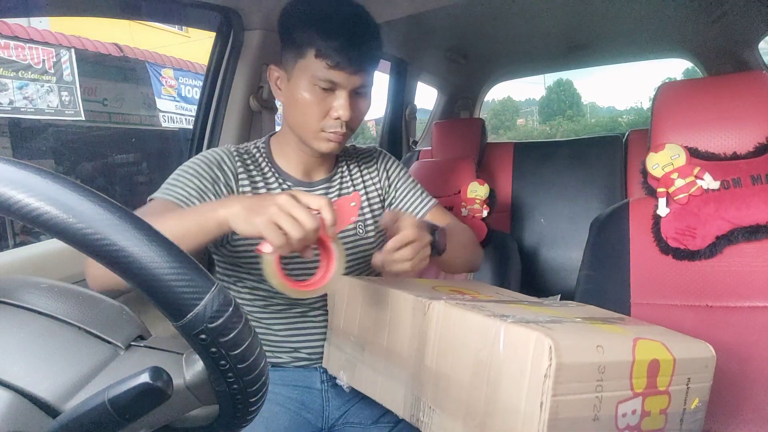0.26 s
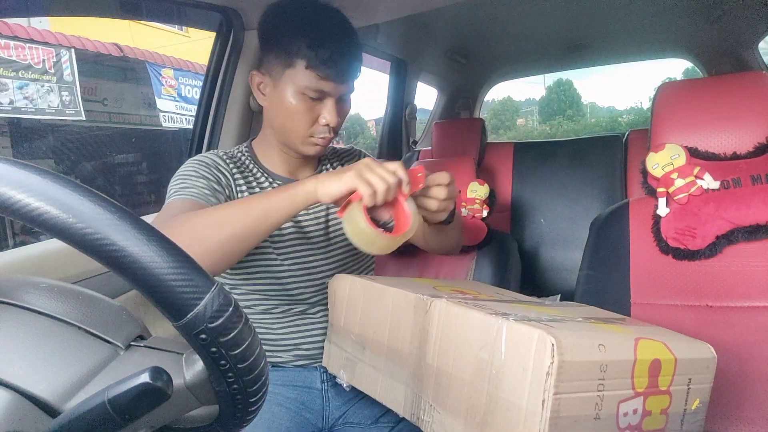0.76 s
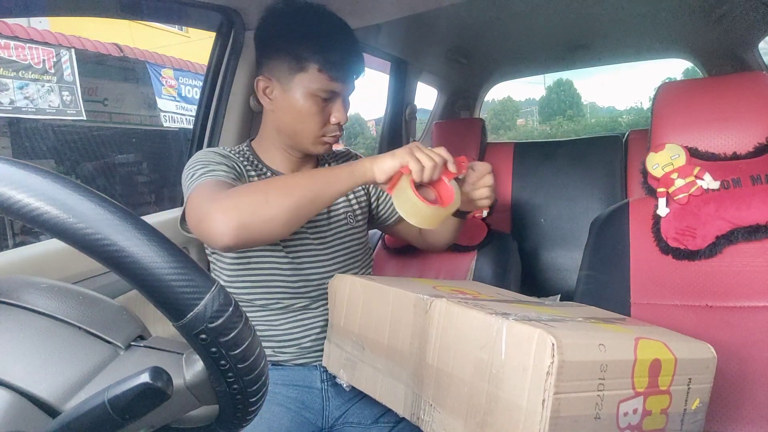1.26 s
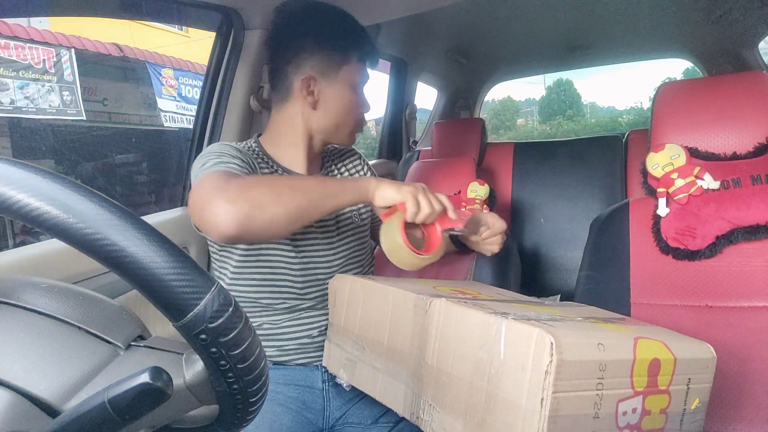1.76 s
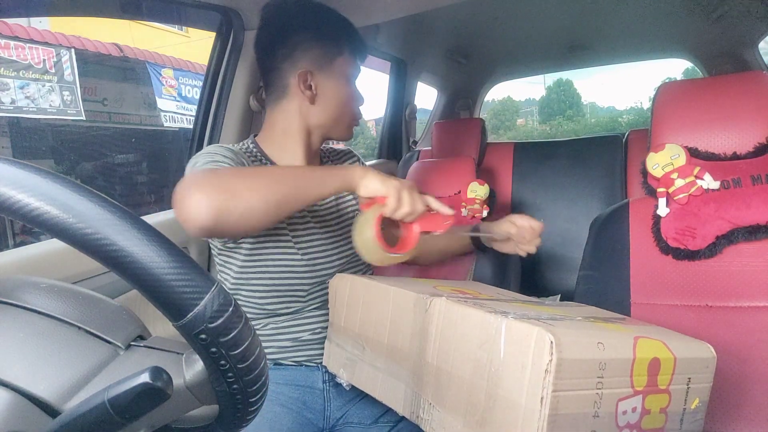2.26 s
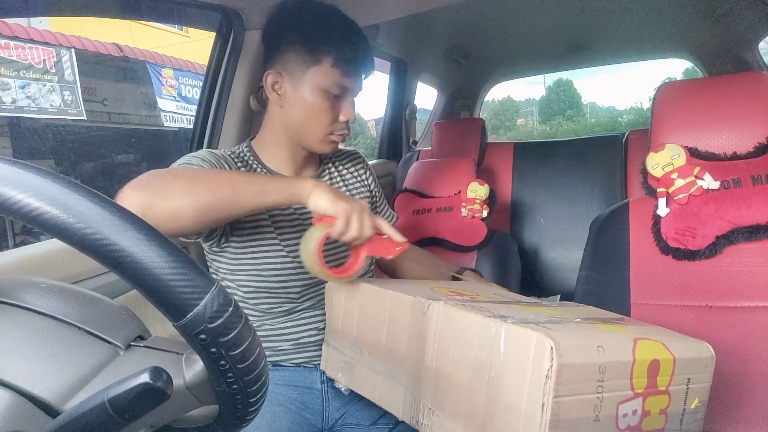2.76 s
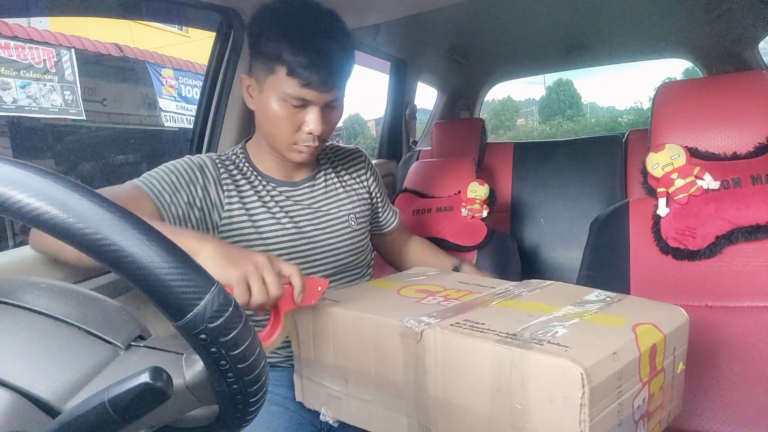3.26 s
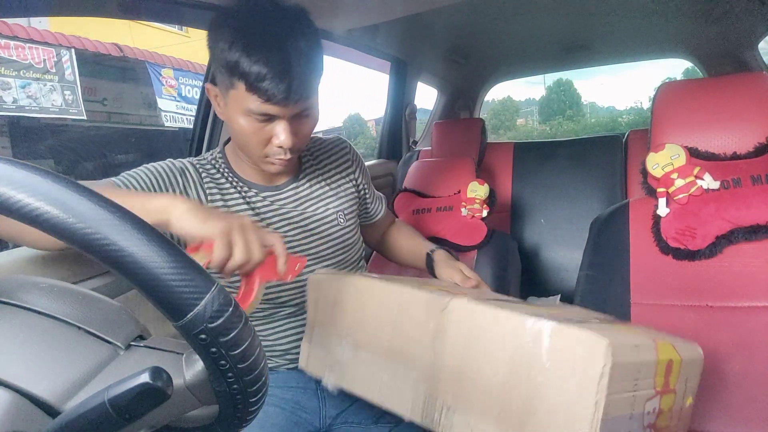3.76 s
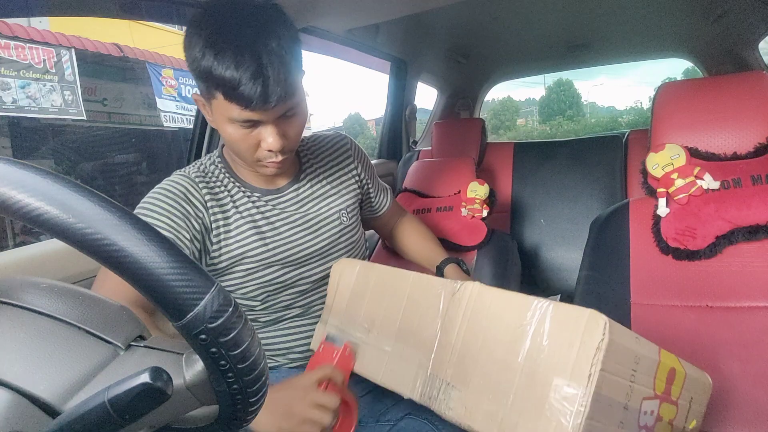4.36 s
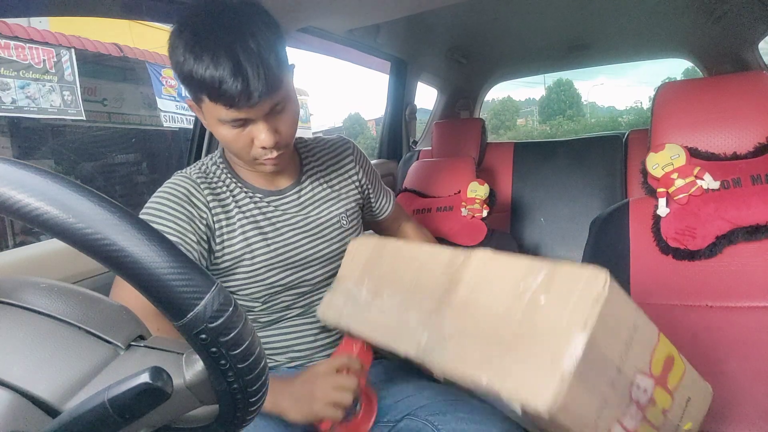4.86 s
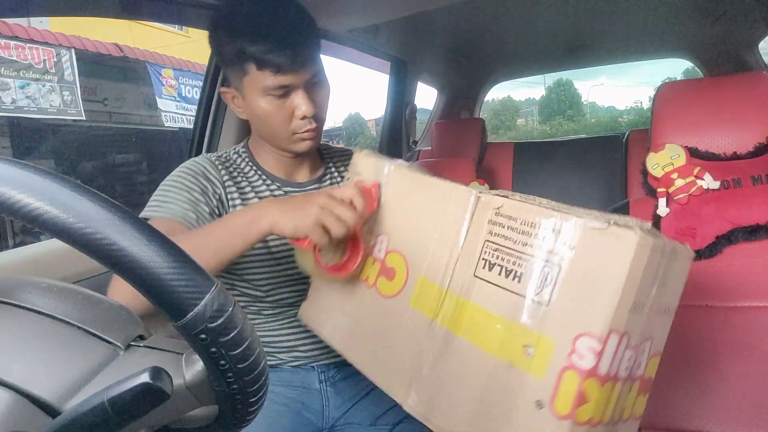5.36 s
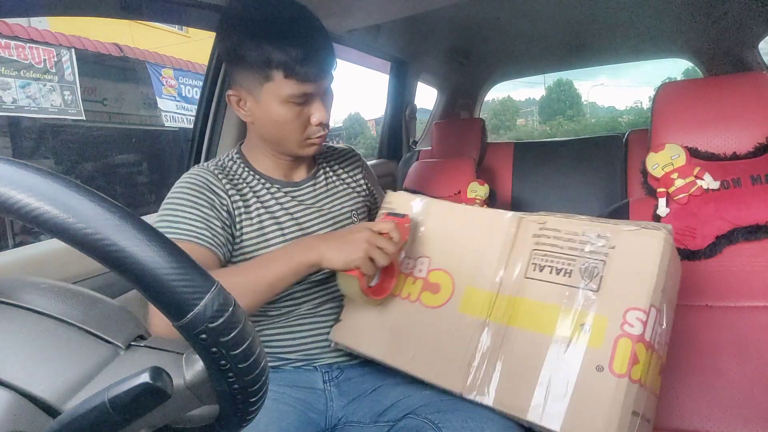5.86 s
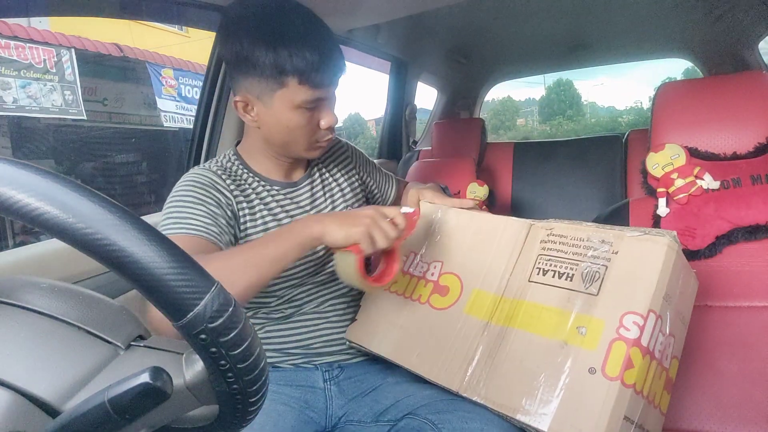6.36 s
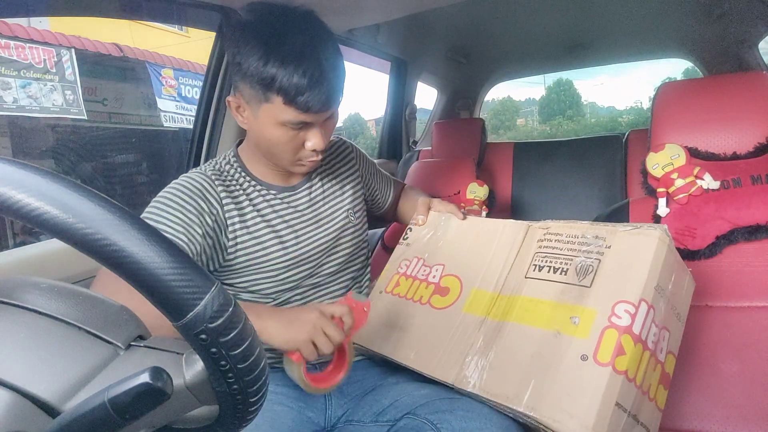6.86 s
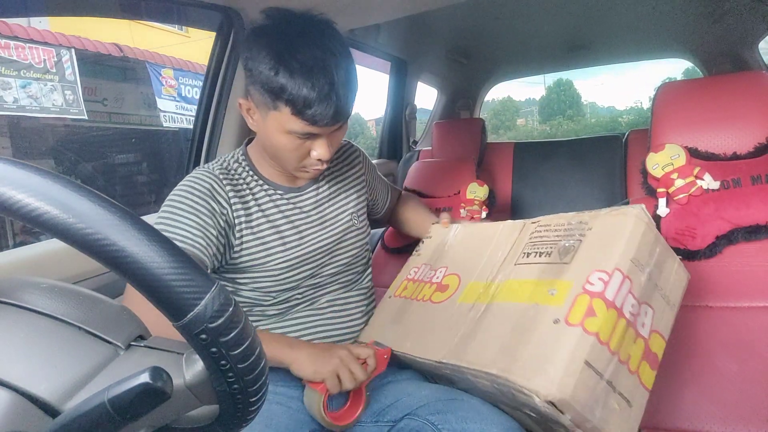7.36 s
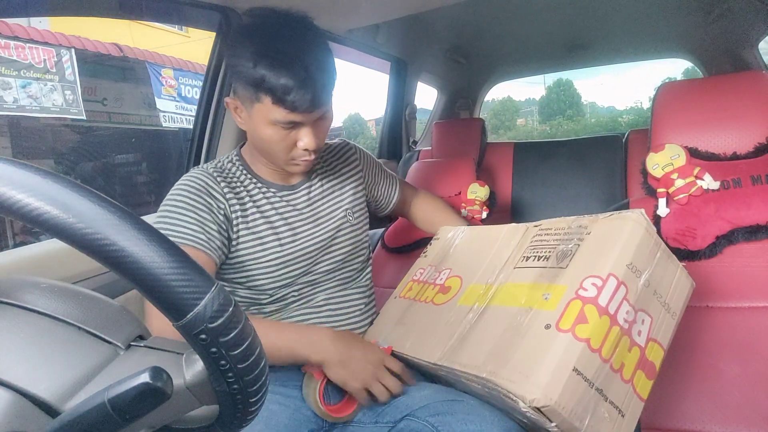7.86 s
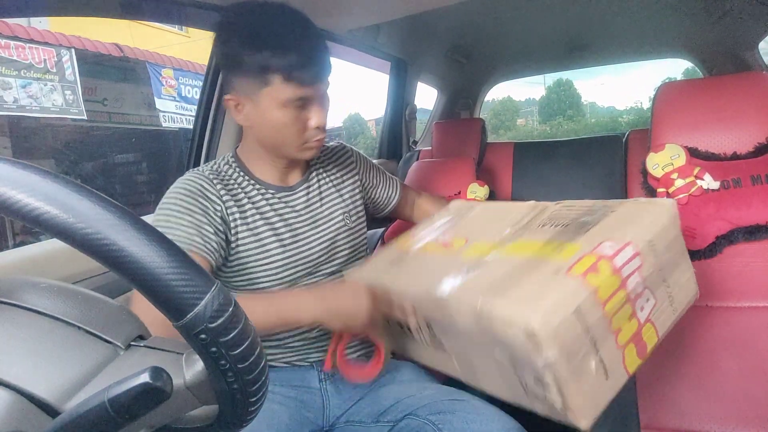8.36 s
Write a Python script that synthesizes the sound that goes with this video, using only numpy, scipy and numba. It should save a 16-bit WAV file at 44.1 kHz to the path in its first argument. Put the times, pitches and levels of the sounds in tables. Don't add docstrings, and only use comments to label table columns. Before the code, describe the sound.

Bright, crackling bursts of sticky tape peeling and snapping, with faint film rustle and soft cardboard knocks, above muffled idling and traffic rumble.

```python
import sys
import numpy as np
from scipy import signal
from scipy.fft import rfft, irfft, next_fast_len
from scipy.io import wavfile
from scipy.ndimage import uniform_filter1d, map_coordinates
from numba import njit

SR = 44100
rng = np.random.default_rng(int(sys.argv[2]) if len(sys.argv) > 2 else 0)


def undo_db(level):
    steps = np.asarray(level, float) / 20
    return 10 ** steps


def wrap_up_sound(samples):
    columns = np.atleast_2d(samples).T
    tamed = np.clip(columns, -1, 1)
    steps = np.round(tamed * 32767).astype(np.int16)
    wavfile.write(sys.argv[1], SR, steps)


N = 380141

# pitch_hz, level_db (per Hz)
ROAD_COLOUR = [(18, -36), (30, -6), (120, -9), (184, -4), (355, -20.5), (499, -22), (540, -25.5),
               (666, -32.5), (889, -29.5), (1190, -37), (1590, -32), (1910, -41.5), (8520, -50.5),
               (16000, -67)]
# pitch_hz, likeness (0-1)
OUTSIDE_ALIKE = [(60, 0.93), (130, 1), (290, 0.78), (520, 0.52), (700, 0.3), (1400, 0.34), (3000, 0.034)]
# start_s, hold_s, depth_db
DUCKS = [(1.106, 0.029, 9.5), (1.217, 0.25, 2), (1.423, 0.039, 7), (1.785, 0.24, 12.5), (3.45, 0.13, 4),
         (4.058, 0.11, 8), (4.931, 0.031, 8), (5.156, 0.044, 5), (5.435, 0.059, 3), (5.6, 0.036, 12),
         (5.7, 0.13, 5), (6.06, 0.097, 15.5), (6.293, 0.19, 13), (6.684, 0.059, 11.5), (8.15, 0.058, 6)]
# time_s, firing_hz, first_order_db, second_order_db
ENGINE = [(0.0, 27.9, -34.5, -32), (1.06, 27.59, -41.5, -35), (1.9, 31.05, -57, -66.5),
          (2.09, 33, -47.5, -48.5), (2.64, 34, -45.5, -53), (3.77, 25.69, -39, -46),
          (4.08, 24.45, -61, -74), (4.44, 24.33, -50, -41.5), (6.7, 25.13, -49.5, -76),
          (7.13, 25.45, -42.5, -59), (7.46, 23.52, -53, -37), (7.92, 23.46, -35.5, -40.5),
          (8.09, 25.05, -39, -55), (8.62, 23.4, -37, -32.5)]
# multiple (of firing_hz), level_db (re second order)
HIGHER_ORDERS = [(3, -39), (4, -12.5), (6, -16.5), (7, -20.5), (10, -19.5)]
# time_s, pitch_hz, level_db
SECOND_MOTOR = [
    (0, 125.8, -61),
    (.15, 126.9, -47),
    (.262, 127.1, -41),
    (.426, 131, -38.5),
    (.6, 134.9, -43),
    (1.085, 138.5, -37.5),
    (1.12, 143.4, -60),
    (1.7, 137.7, -40.5),
]

# start_s, peak_db
TICKS = [(0.124, -36), (.179, -12.5), (.2618, -46), (0.5454, -30), (.605, -39), (0.619, -34),
         (0.642, -24.5), (.7058, -46), (.735, -32), (.8984, -39), (0.9703, -35), (1.0056, -26),
         (1.5655, -26.5), (2.14, -26), (2.724, -16.5), (2.945, -28), (3.1899, -17.5), (3.24, -34),
         (3.262, -32), (3.76, -41), (3.79, -25), (3.988, -31), (4.008, -35), (4.364, -34), (4.384, -26.5),
         (4.767, -24.5), (7.2545, -31.5), (8.027, -22.5), (7.873, -27), (8.339, -28.5), (8.379, -20),
         (8.547, -21.5)]
# start_s, length_s, start_level_db, end_level_db
RIPS = [(.935, 0.037, -43.5, -29), (1.09, 0.047, -17.5, -17.5), (1.149, 0.02, -17, -26.5),
        (1.42, 0.044, -15, -22.5), (1.747, 0.03, -18.5, -15), (1.79, 0.29, -15.5, -15.5),
        (2.459, 0.022, -16.5, -18), (2.502, 0.065, -18, -17.5), (2.577, 0.032, -20.5, -17),
        (2.602, 0.026, -17, -18), (2.63, 0.069, -23, -35), (3.309, 0.048, -16, -20),
        (3.354, 0.18, -16.5, -18), (4.068, 0.05, -23.5, -16), (4.128, 0.093, -15.5, -16.5),
        (4.852, 0.12, -27, -32), (5.056, 0.047, -36.5, -26), (5.113, 0.018, -25, -17),
        (5.138, 0.013, -12.5, -20), (5.16, 0.026, -37, -37), (5.442, 0.047, -30.5, -29.5),
        (5.512, 0.12, -24.5, -27.5), (5.68, 0.01, -51, -19.5), (5.692, 0.069, -28.5, -31),
        (5.923, 0.027, -24, -35.5), (6.077, 0.082, -29.5, -22.5), (6.13, 0.058, -20, -20.5),
        (6.195, 0.031, -19.5, -25.5), (6.298, 0.078, -23.5, -25.5), (6.366, 0.061, -22, -13.5),
        (6.432, 0.11, -13, -21), (6.639, 0.13, -16, -18.5), (6.739, 0.054, -17, -19),
        (8.328, 0.039, -32, -41), (8.45, 0.036, -43, -27.5), (8.48, 0.03, -26, -39)]
# start_s, peak_db, t60_s
JERKS = [(1.0384, -11.5, 0.032), (1.196, -6, 0.05), (1.2311, -3, 0.031), (1.3241, 3, 0.02),
         (1.384, -4.5, 0.057), (1.6748, -16.5, 0.048), (1.6996, -11.5, 0.042), (3.835, -1, 0.048),
         (3.873, -6, 0.034), (3.8907, -7, 0.029), (5.3057, -12, .017), (5.316, -1, 0.024),
         (5.3387, -3.5, 0.029), (5.951, -7, .04), (6.037, -14, 0.024), (6.0437, -17.5, 0.086),
         (6.262, -2, 0.021), (7.7869, -10.5, 0.038), (7.8037, -11.5, 0.044), (8.0885, -4, 0.022),
         (8.123, -4.5, 0.063), (8.1845, -11, 0.038), (8.1993, -4.5, 0.018), (8.262, -12.5, 0.019)]
# start_s, peak_db
STUTTERS = [(1.0888, -8.5), (1.15, -10), (1.4182, -7), (1.756, -12), (1.764, -12), (1.7747, -19),
            (1.791, -28), (1.8094, -28), (2.459, -16), (2.4997, -13), (2.565, -20), (2.6355, -15),
            (2.66, -16), (3.309, -6), (3.3157, -3.5), (3.424, -14), (3.4545, -17), (3.462, -16),
            (4.041, -2.5), (4.054, -5), (4.0682, -17), (4.081, -10), (4.853, -6), (4.893, -9.5),
            (4.9112, -6), (4.916, -14), (4.953, -17), (4.977, -13), (5.075, -18.5), (5.119, -9.5),
            (5.178, -17), (5.192, -20.5), (5.443, -6), (5.4595, -3.5), (5.4737, -3.5), (5.5114, -11),
            (5.5225, -5), (5.5338, -7), (5.5388, -18), (5.5608, -5), (5.58, -4.5), (5.612, -6.5),
            (5.6992, -8), (5.711, -14), (5.7267, -6), (5.7375, -13), (5.7567, -2), (5.924, -8),
            (5.9375, -6), (6.076, -22), (6.184, -9), (6.197, -17), (6.299, -18), (6.4038, -15),
            (6.5013, -13), (6.536, -5), (6.639, -22), (6.6536, -18), (6.713, -24), (8.131, -7)]
# pitch_hz, level_db (per Hz)
PEEL_COLOUR = [(530, -41), (900, -37), (979, -9.5), (1130, -30), (1340, -16.5), (1900, -9), (2730, -9.5),
               (3860, -2), (5160, -0.5), (8550, 3.5), (11700, -14.5), (15100, -26), (16000, -3)]
# start_s, ring_hz, tuned_share (0-1), level_db (re peel)
SPAN = [(0, 515, 0.3, -22), (1.095, 579, .7, -18.5), (1.13, 981, 0.4, -24), (1.225, 1400, 0.5, -17),
        (1.3, 1000, 0.1, -21), (1.72, 504, 0.58, -20.5), (2.4, 984, 0.16, -9), (2.535, 930, 0.11, -11.5),
        (2.7, 1400, 0.3, -23), (3.295, 925, 0.4, -15), (3.345, 940, .1, -12.5), (3.39, 966, 0.3, -13.5),
        (3.465, 1610, 0.8, -14.5), (3.7, 1130, 0.44, -18), (3.92, 920, 0.3, 4.5), (4.03, 954, 0.8, -11.5),
        (4.075, 960, 0.52, -12.5), (4.14, 885, 0.6, -12.5), (4.18, 1015, 0.5, -10.5), (4.3, 940, 0.15, -3),
        (4.8, 940, 0, -30), (5.03, 427, 0.3, -11.5), (5.25, 925, 0, -17.5), (5.505, 1095, 0.43, -16.5),
        (5.68, 910, 0, -21), (5.9, 1276, 0.1, -18), (6.03, 1320, 0, -19), (6.14, 1510, 1, -12),
        (6.33, 1490, 0.1, -21), (6.41, 1520, 0.3, -20.5), (6.46, 980, 0.4, -17), (6.6, 1613, 0, -14),
        (6.7, 1470, 0.4, -18), (7.5, 807, .4, -22.5)]
# start_s, ring_hz, ring_db (re peel), fizz_db (re peel)
GRIP = [(0, 2070, -17, -4), (1.13, 2180, -8, -12), (1.3, 2140, -26, -5.5), (1.72, 1860, -8, -9),
        (1.83, 1886, -12, -10.5), (2.4, 1930, -13, -24), (2.515, 3060, -6.5, -9), (2.575, 3020, -21, -12),
        (2.6, 2980, -8, -5), (2.645, 2850, -25, -7), (3.2, 2727, -14, -5), (3.35, 2600, -25, 0.5),
        (3.41, 2400, -11, -6), (3.445, 2200, -11, -10), (3.478, 1610, -8, -9), (3.7, 2190, -27, -13),
        (4.15, 2220, -29, -5), (4.19, 1790, -5.5, -5), (4.3, 2260, -31, -0.5), (5.03, 2310, -14.5, -4.5),
        (5.25, 2140, -28, -2), (5.68, 2100, -35, 2.5), (5.75, 2170, 1.5, 5), (5.9, 1810, -8, 2.5),
        (6.03, 2040, -0.5, -9), (6.12, 2120, -3, -6), (6.29, 2030, -9, -14), (6.41, 2240, -12, -12),
        (6.6, 2280, -11, -23), (7.5, 2400, -21, -6), (8.3, 2290, -22, -4)]
# start_s, low_hz, low_db (re peel), high_hz, high_db (re peel)
ROLL = [(0, 4460, -7, 7140, -5), (.9, 2870, -17, 4450, -17.5), (1.3, 2490, -18.5, 3960, -19),
        (1.72, 2920, -8.5, 3700, -12), (1.83, 3053, -17, 4520, -18), (1.95, 3380, -22, 4100, -22),
        (2.4, 3280, -22, 3750, -11), (2.5, 1860, -12, 4210, -13), (2.58, 4160, -23, 4700, -30),
        (3.2, 2750, -20, 4270, -8), (3.335, 1570, -29, 4350, -24), (3.415, 3400, -18, 4350, -12),
        (3.44, 3300, -24, 3790, -16), (3.49, 3230, -11.5, 2170, -8.5), (3.7, 1770, -16, 4150, -12),
        (4.02, 3100, -15, 6650, -13), (4.13, 3000, -15, 477, -26), (4.178, 2950, -16, 730, -23),
        (4.3, 2940, -26, 4240, -34), (5.03, 2000, -20, 4210, -20), (5.25, 3080, -19, 5780, -13),
        (5.4, 2230, -12.5, 4130, -17), (5.505, 2210, -17, 3720, -19), (5.68, 2200, -29, 4370, -20),
        (5.9, 2100, -12, 3730, -12), (6.03, 3700, -7.5, 4850, -24), (6.205, 3500, -14, 1480, -13.5),
        (6.258, 3670, -14, 4910, -13.5), (6.37, 3600, -10, 4770, -21), (6.46, 3000, -7, 3770, -10.5),
        (6.6, 3010, -13, 3960, -20), (6.7, 880, -16, 3960, -10.5), (7.5, 2800, -6.5, 3600, -8),
        (7.95, 2106, -20, 3530, -18), (8.3, 2310, -23, 4320, -21)]
# start_s, level_db (re peel)
CARTON = [(0, -23), (.9, -13.5), (1.3, -11.5), (1.72, -11.5), (1.83, -11.5), (2.4, -7), (2.5, -8.5),
          (2.58, -7.5), (2.7, -20), (3.2, -11), (3.34, -18), (3.41, -7), (3.7, -2.5), (4.02, -13),
          (4.13, -15.5), (4.3, 2.5), (4.8, -27), (5.03, -19), (5.25, -26), (5.4, -19), (5.505, -11.5),
          (5.68, -19), (5.9, -16.5), (6.03, -8.5), (6.24, -4.5), (6.37, -12), (6.46, -18), (6.6, -9),
          (6.7, -9.5), (7.5, -19), (7.95, -4), (8.3, -14.5)]

# start_s, length_s, start_level_db, end_level_db
RUSTLE = [(.9, .18, -65, -50), (1.25, 0.11, -44, -35), (1.57, 0.028, -42.5, -43), (1.63, .11, -69, -44.5),
          (2.12, 0.17, -49, -63), (2.365, 0.097, -45, -50), (2.7, 0.25, -46, -58), (3.21, 0.088, -60, -38),
          (3.6, 0.21, -64, -36), (3.985, 0.073, -52, -31.5), (4.26, 0.38, -51, -47),
          (4.45, 0.31, -52.5, -33.5), (4.68, 0.16, -36, -40), (4.99, 0.068, -41, -46),
          (5.21, 0.088, -61, -44), (5.37, 0.051, -42, -32.5), (5.865, 0.05, -40, -39.5),
          (5.98, 0.059, -44, -29), (6.57, 0.091, -54.5, -33), (6.84, 0.2, -64, -41.5),
          (7.05, .17, -38, -52), (7.26, 0.144, -51.5, -43.5), (7.39, 0.085, -44, -60),
          (7.48, 0.31, -56.5, -50.5), (7.83, 0.24, -45, -45), (8.027, 0.076, -41, -38),
          (8.22, 0.42, -43.5, -39)]
# pitch_hz, level_db (per Hz)
FILM_COLOUR = [(880, -13), (1500, -2), (1760, -6), (5280, -2.5), (7610, 3.5), (12700, -6.5), (15100, -3),
               (16000, -5.5)]
# start_s, peak_db, low_hz, high_hz, high_db (re low)
KNOCKS = [(3.19, -24, 170, 346, -10), (3.99, -43, 302, 517, -1), (4.008, -38, 300, 520, -5),
          (4.384, -29, 221, 299, -24), (4.63, -27, 164, 302, -17), (4.752, -26.5, 253, 490, -5),
          (5.073, -31, 246, 318, -13), (5.097, -17, 148, 427, 1.5), (5.148, -34, 277, 497, 5),
          (5.316, -31.5, 331, 420, 6), (5.34, -29, 338, 418, -9), (5.984, -23, 202, 367, -21),
          (8.089, -35, 175, 517, 1), (8.122, -27.5, 273, 308, 4.5), (8.412, -28.5, 216, 352, -2.5)]

# time_s, left_minus_right_db
PAN = [(0.0, 2), (1.18, -2), (1.78, 1), (2.93, -1), (3.65, 2), (3.89, -2), (5.76, 0.5), (6.07, -1),
       (7.01, 3.5), (7.08, -0.5), (8.62, -0.5)]
# pitch_hz, left_lead_rad (radians)
LEAD = [(150, 0), (520, .9), (700, 1), (1030, -.8), (1400, -3.3), (2000, -6.1), (5000, -3.9)]
# pitch_hz, likeness (0-1)
CABIN_ALIKE = [(500, 0.71), (800, 0.13), (1800, 0.35), (4000, 0.034)]
# pitch_hz, left_minus_right_db
PORTS = [(2000, -1), (5000, -1.5), (8500, -1), (10500, 7), (12500, -2.5)]

CABIN_T60_S, FIRST_T60_S = 0.084, 0.0069
DRONE_DB, DUCK_IN_DB_PER_S, DUCK_OUT_DB_PER_S = -36, 353, 86
VALVE_DB, VALVE_T60_S = -23, 0.0053
LET_GO_T60_S, STUTTER_T60_S, TICK_T60_S = 0.048, 0.017, 0.057
SNAP_RISE_S = 0.00099
TICK_LIFT_DB = 3.5
TAUT = 0.087
FLICKER = 0.94
GRIP_WIDTH_HZ, ROLL_WIDTH_HZ, SPAN_WIDTH_HZ = 190., 240., 200.
GLIDE_S = .025
RUSTLE_REST_DB, RUSTLE_T60_S = -71, 0.065


def unit(x):
    return x / np.sqrt(np.mean(x ** 2) + 1e-20)


def along(points, hz):
    f, v = np.transpose(points)
    return np.interp(np.log(hz + 1), np.log(f + 1), v)


def curves(rows):
    s, *cols = np.transpose(rows)
    return [np.interp(np.arange(N) / SR, s, c) for c in cols]


def held(rows):
    s, *cols = np.transpose(rows)
    row = np.searchsorted(s, np.arange(N) / SR) - 1
    return np.array(cols)[:, np.clip(row, 0, None)]


def wobble(rate):
    knots = rng.standard_normal(int(N * rate / SR) + 4)
    return map_coordinates(knots, [np.arange(N) * rate / SR])


def strokes(rows, t60):
    t, db = np.arange(N) / SR, np.full(N, -120.)
    for s, length, start_db, end_db in rows:
        now = slice(round(s * SR), round((s + length + t60) * SR))
        course = np.interp(t[now] - s, [0, length, length + t60], [start_db, end_db, end_db - 42.0])
        db[now] = np.maximum(db[now], course)
    return undo_db(db)


def filtered(x, response):
    m = next_fast_len(x.shape[-1] + 8192)
    return irfft(rfft(x, m) * response(np.fft.rfftfreq(m, 1 / SR)), m)[..., :x.shape[-1]]


def shaped(points):
    return lambda x: filtered(x, lambda hz: undo_db(along(points, hz)))


def slips(rate, spread_db):
    hit = rng.random(N) < rate / SR
    size_db = spread_db * np.clip(rng.exponential(size=N), 0, 3.4)
    return unit(hit * rng.choice([-1, 1], N) * undo_db(size_db))


@njit
def ring(x, hz, width_hz, sr):
    y, z, r = np.zeros(len(x)), 0j, np.exp(-np.pi * width_hz / sr)
    for n in range(len(x)):
        z = r * np.exp(2j * np.pi * hz[n] / sr) * z + x[n]
        y[n] = np.sqrt(2 * (1 - r * r)) * (z.real - x[n] / 2)
    return y


def blend(pair, alike):
    def mid_side(hz):
        turn = np.arccos(np.clip(along(alike, hz), -1, 1)) / 2
        return np.array([np.cos(turn), np.sin(turn)])
    mid, side = filtered(pair, mid_side)
    return np.array([mid + side, mid - side])


def patchy(pair, shared_db, own_db):
    z = signal.stft(pair, nperseg=2048)[2]
    field = rng.standard_normal((3,) + z.shape[1:])
    field = uniform_filter1d(field, size=4, axis=1)
    field = unit(uniform_filter1d(field, size=7, axis=2))
    return signal.istft(z * undo_db(shared_db * field[0] + own_db * field[1:]), nperseg=2048)[1][:, :N]


def cabin(layers, excite, direct_db, first_db, patchy_db):
    t = np.arange(SR // 8) / SR
    decay = undo_db(-120 * t / CABIN_T60_S) + undo_db(2 * first_db - 120 * t / FIRST_T60_S)
    decay /= decay.sum()
    diffuse = patchy(blend(rng.standard_normal((2, N)), CABIN_ALIKE), patchy_db, 0.39 * patchy_db)
    heard = np.zeros((2, N))
    for level, colour in layers:
        sound = level * unit(colour(excite))
        power = np.abs(signal.oaconvolve(sound ** 2, decay)[:N])
        echoes = unit(np.array([colour(port) for port in diffuse]))
        heard += undo_db(direct_db) * sound + np.sqrt(power) * echoes
    lag = np.round(1.7 * wobble(1.5)).astype(int)
    return np.take_along_axis(heard, np.clip(np.arange(N) + [lag, -lag], 0, N - 1), axis=1)


def ducked_db():
    t, cuts = np.arange(N) / SR, []
    for s, hold, depth_db in DUCKS:
        before = np.maximum(DUCK_IN_DB_PER_S * (s - t), 0)
        after = np.maximum(DUCK_OUT_DB_PER_S * (t - s - hold), 0)
        cuts.append(depth_db - before - after)
    return DRONE_DB - np.clip(np.max(cuts, axis=0), 0, None)


def traffic():
    noise = blend(rng.standard_normal((2, N)), OUTSIDE_ALIKE)
    return unit(shaped(ROAD_COLOUR)(patchy(noise, shared_db=1.93, own_db=-0.07)))


def idling_engine(turn, first_db, second_db):
    higher = sum(undo_db(db) * np.cos(k * turn) for k, db in HIGHER_ORDERS)
    return undo_db(first_db) * np.cos(turn) + undo_db(second_db) * (np.cos(2 * turn) + higher)


def engine_valves(turn, second_db):
    fired = np.diff(np.floor(turn / (2 * np.pi)), prepend=0)
    decay = undo_db(-60 * np.arange(SR // 50) / SR / VALVE_T60_S)
    level = signal.oaconvolve(fired * undo_db(second_db + VALVE_DB + 3.5 * wobble(30)), decay)[:N]
    colour = shaped([(4500, -25), (6500, 0), (11000, -1), (14000, -12)])
    return level * unit(colour(rng.standard_normal((2, N))))


def second_motor():
    hz, db = curves(SECOND_MOTOR)
    level = undo_db(db + 0.35 * wobble(15.0)) * (np.arange(N) < 1.75 * SR)
    shaft = np.pi * np.cumsum(hz) / SR
    return level * (np.sin(2 * shaft) + 0.43 * np.sin(3 * shaft) + 0.19 * np.sin(5 * shaft))


def outside():
    drone_db = ducked_db()
    firing_hz, first_db, second_db = curves(ENGINE)
    turn = 2 * np.pi * np.cumsum(firing_hz) / SR
    throb = 1 + 8 * undo_db(second_db) * np.cos(turn)
    road = undo_db(drone_db + 0.54) * throb * traffic()
    duck_db = drone_db - uniform_filter1d(drone_db, SR)
    engine = undo_db(1.1 * duck_db + 0.32 * wobble(7.3)) * idling_engine(turn, first_db, second_db)
    return engine_valves(turn, second_db) + road + np.sqrt(2) * (engine + second_motor())


def single_snaps():
    t, level, cracks = np.arange(N) / SR, np.zeros(N), np.zeros(N)
    stutters = [(s, db, STUTTER_T60_S) for s, db in STUTTERS]
    ticks = [(s, db, TICK_T60_S) for s, db in TICKS]
    for s, db, t60 in JERKS + stutters + ticks:
        now = slice(round(s * SR), round(s * SR) + SR // 8)
        age = t[now] - s
        level[now] += undo_db(db - 9.5 - 60 * age / t60) * (1 - 0.57 * np.exp(-age / SNAP_RISE_S))
        cracks[now.start] = 8
    return level, cracks


def tape():
    clumps = undo_db(1.4 * np.tanh(wobble(60)) + 1.3 * np.tanh(wobble(250)))
    pull = clumps * strokes(RIPS, LET_GO_T60_S) * undo_db(-4.5)
    tugged = pull * clumps ** FLICKER
    snaps, cracks = single_snaps()
    glue = slips(rate=9000, spread_db=3.5) + cracks
    tick_rows = [(s, TICK_T60_S, TICK_LIFT_DB, TICK_LIFT_DB) for s, db in TICKS]
    bright = strokes(tick_rows, TICK_T60_S).clip(1)
    snaps /= bright

    span_hz, tuned, span_db = held(SPAN)
    grip_hz, grip_db, fizz_db = held(GRIP)
    low_hz, low_db, high_hz, high_db = held(ROLL)
    glide = uniform_filter1d(np.array([span_hz, grip_hz]), round(GLIDE_S * SR))
    span_hz, grip_hz = glide * clumps ** TAUT
    low_hz, high_hz = np.array([low_hz, high_hz]) * clumps ** (TAUT / 2)

    span = (pull + snaps * undo_db(3.0)) * undo_db(span_db)
    roll = tugged + snaps * undo_db(-4.0)
    fizz = pull * undo_db(fizz_db) + snaps * bright ** 2 * undo_db(-11)
    grip = tugged * undo_db(grip_db) + snaps * undo_db(0.55 * grip_db - 6.0)
    fizz_colour = [(6000, -21.5), (9500, 2.5), (16000, 10.0)]
    carton_colour = [(800, -23.5), (1300, -3.0), (2400, 0.5), (3200, 3.5), (4500, -9.5)]
    slack_colour = [(250, -17.5), (450, -0.5), (1400, -5.5), (2000, -16.0)]

    def span_ring(x):
        once = ring(x, span_hz, SPAN_WIDTH_HZ, SR)
        return ring(once, span_hz, SPAN_WIDTH_HZ, SR)

    layers = [(pull + snaps, shaped(PEEL_COLOUR)),
              (fizz, shaped(fizz_colour)),
              (grip, lambda x: ring(x, grip_hz, GRIP_WIDTH_HZ, SR)),
              (roll * undo_db(low_db), lambda x: ring(x, low_hz, ROLL_WIDTH_HZ, SR)),
              (roll * undo_db(high_db), lambda x: ring(x, high_hz, ROLL_WIDTH_HZ, SR)),
              (roll * undo_db(held(CARTON)[0]), shaped(carton_colour)),
              (span * np.sqrt(tuned), span_ring),
              (span * np.sqrt(1 - tuned), shaped(slack_colour))]
    return cabin(layers, glue, direct_db=-4.5, first_db=12.0, patchy_db=2.8)


def rustle():
    flutter = undo_db(2.7 * wobble(40) + 0.54 * wobble(110))
    level = (strokes(RUSTLE, RUSTLE_T60_S) + undo_db(RUSTLE_REST_DB)) * flutter
    crackle = slips(rate=2700, spread_db=4)
    return cabin([(level, shaped(FILM_COLOUR))], crackle, direct_db=-6.0, first_db=-13.0, patchy_db=2.0)


def box():
    out, t = np.zeros(N + SR), np.arange(SR // 8) / SR
    soft_start = 1 - np.exp(-t / 0.0019)
    for s, db, low_hz, high_hz, high_db in KNOCKS:
        low = np.sin(2 * np.pi * low_hz * t) * undo_db(-60 * t / 0.047)
        high = np.sin(2 * np.pi * high_hz * t) * undo_db(high_db - 60 * t / 0.028)
        out[round(s * SR):][:len(t)] += undo_db(db + 6.0) * (low + high) * soft_start
    return out[:N]


def scene():
    side_db = curves(PAN)[0] / 2
    hands = (tape() + rustle()) * undo_db([side_db, -side_db]) * 1.18
    hands = filtered(hands, lambda hz: np.exp(1j * np.outer([.5, -.5], along(LEAD, hz))))
    return hands + box() * undo_db([[-.5], [.5]]) + outside()


def top_cut(x):
    return signal.sosfilt(signal.butter(12, 17000, fs=SR, output="sos"), x)


def record(dry):
    x = filtered(dry, lambda hz: undo_db(np.outer([.5, -.5], along(PORTS, hz))))
    x = x / (1 + np.abs(x / .85) ** 4) ** (1 / 4)
    x = filtered(x, lambda hz: np.where(hz < 15900, 1, undo_db(-43))) + 0.0013
    return top_cut(x)


dry = scene()
out = record(dry)
wrap_up_sound(out)
```